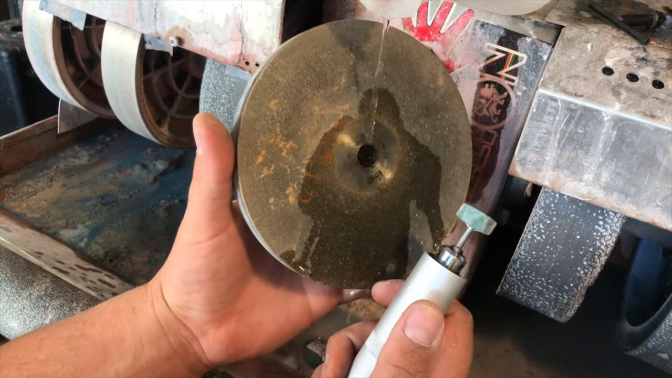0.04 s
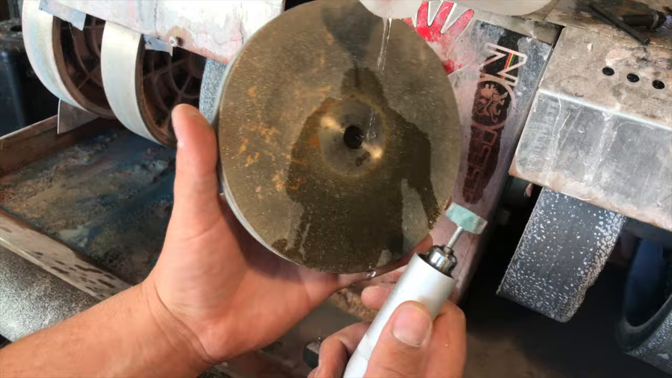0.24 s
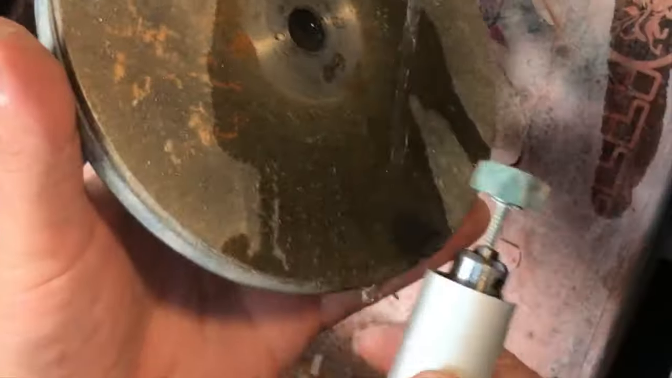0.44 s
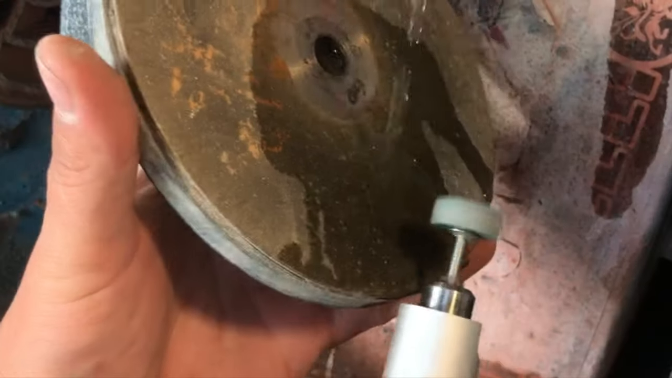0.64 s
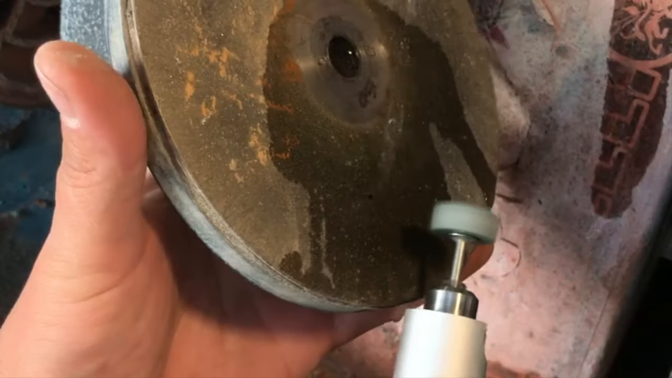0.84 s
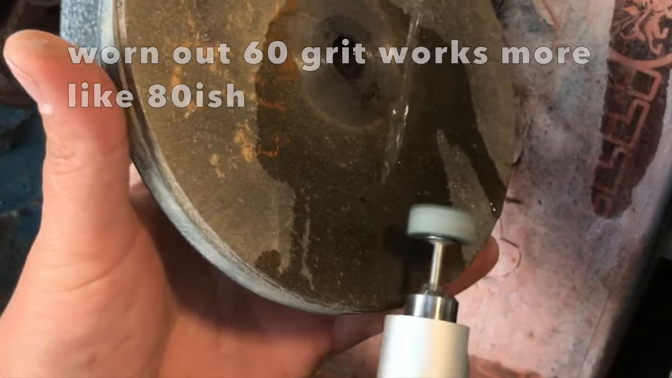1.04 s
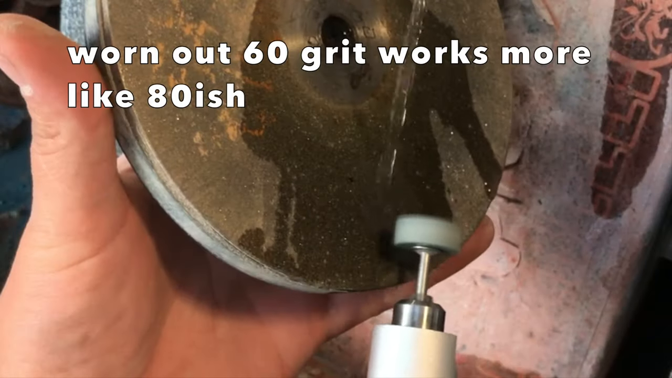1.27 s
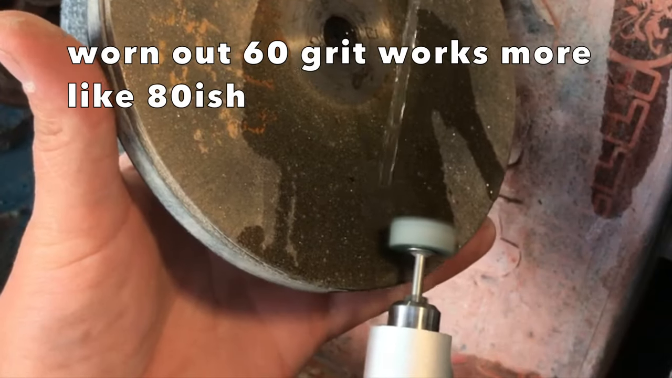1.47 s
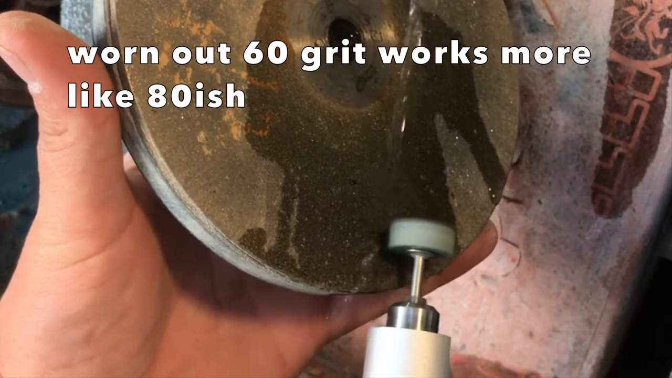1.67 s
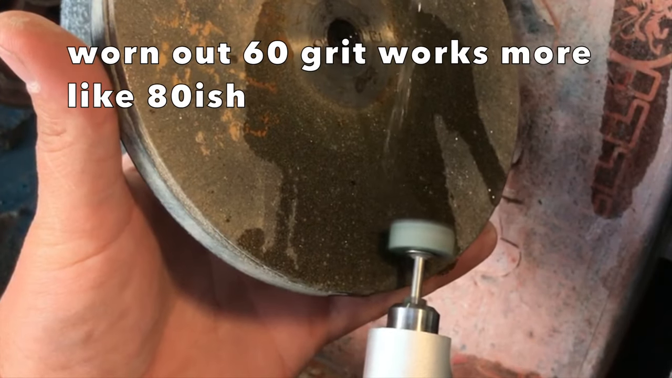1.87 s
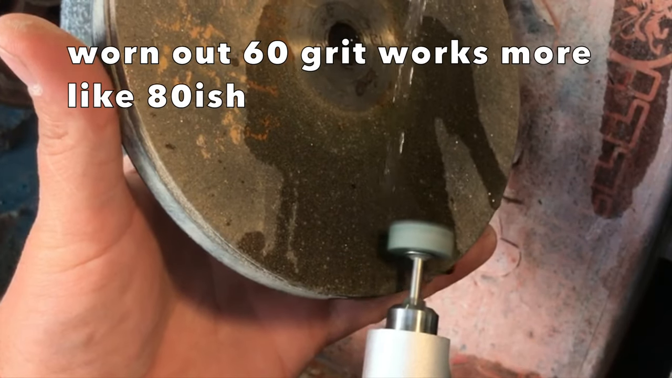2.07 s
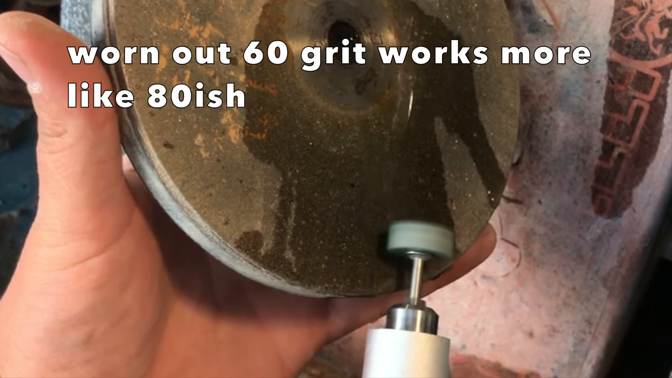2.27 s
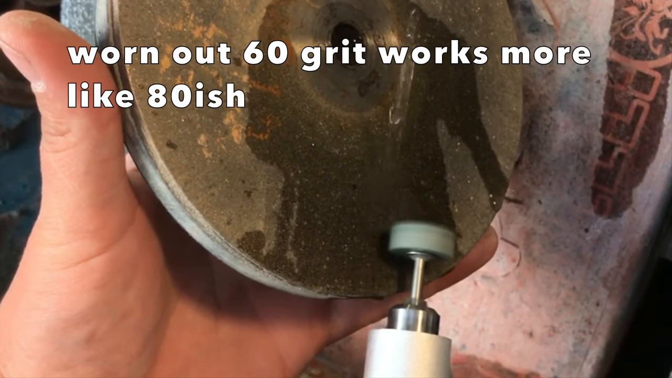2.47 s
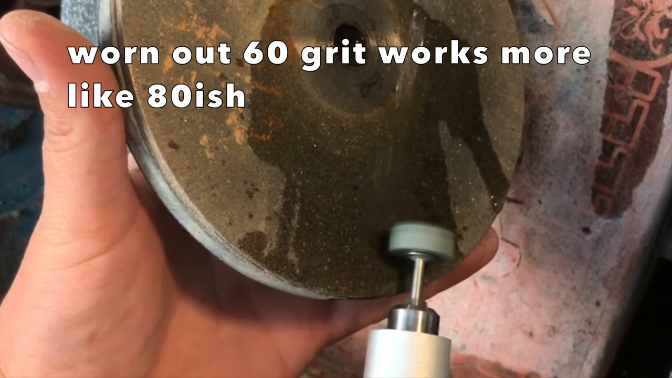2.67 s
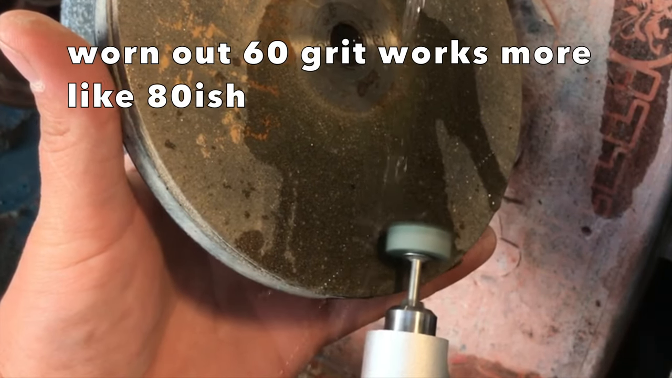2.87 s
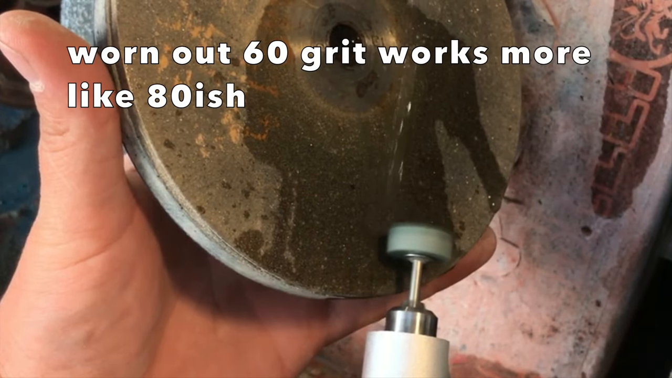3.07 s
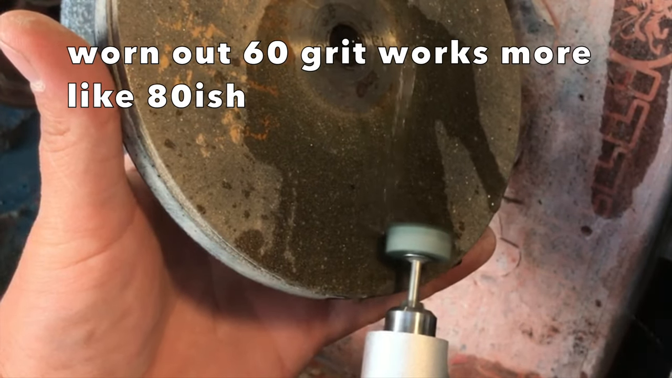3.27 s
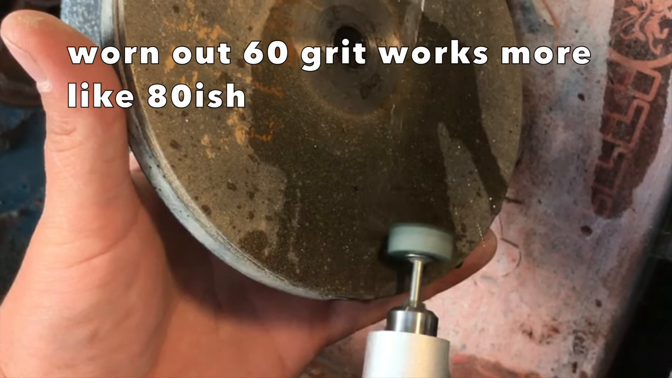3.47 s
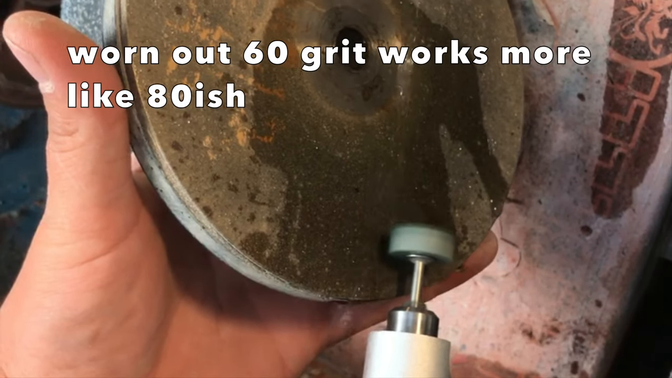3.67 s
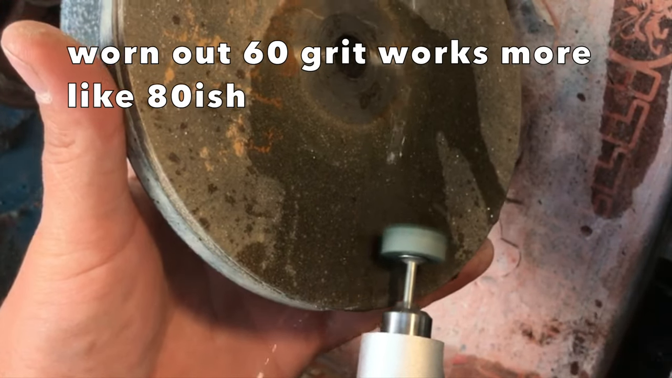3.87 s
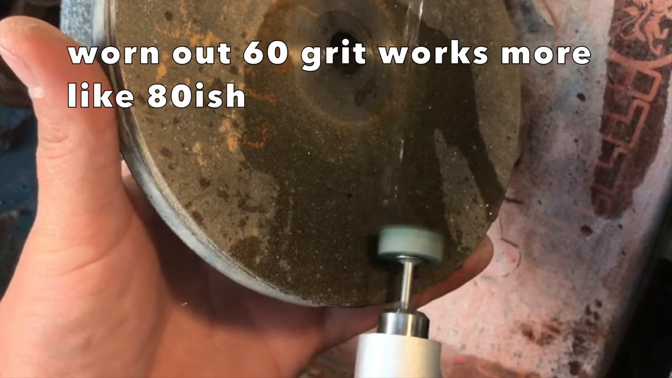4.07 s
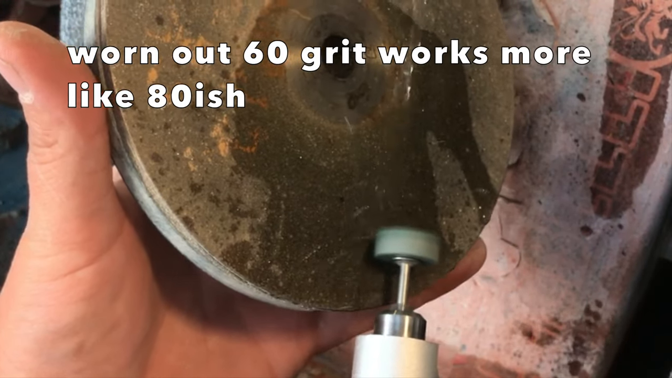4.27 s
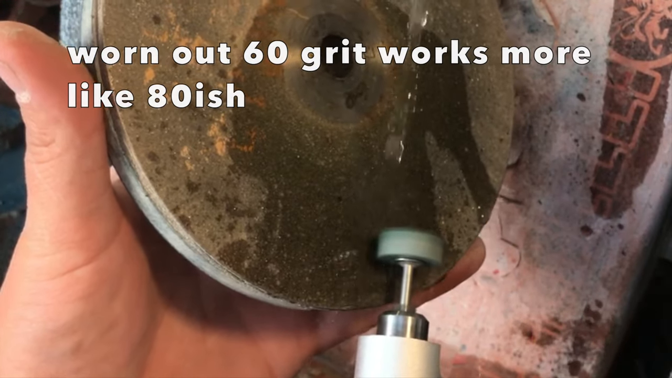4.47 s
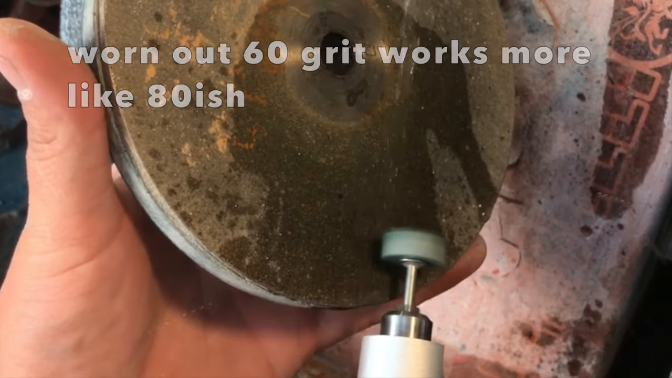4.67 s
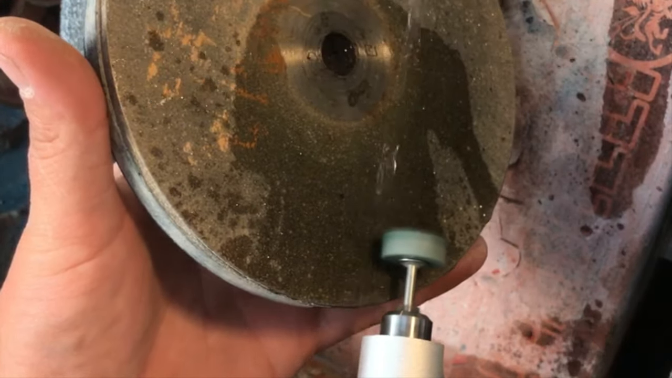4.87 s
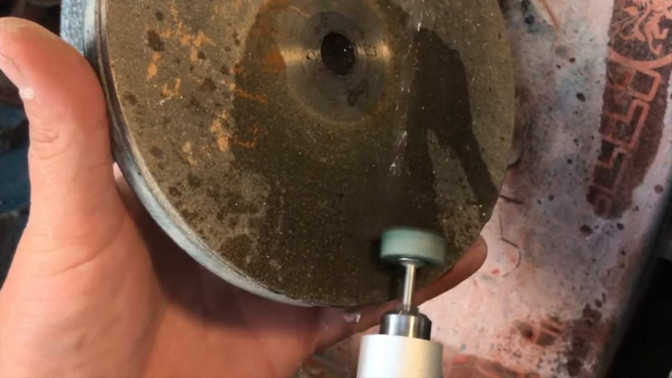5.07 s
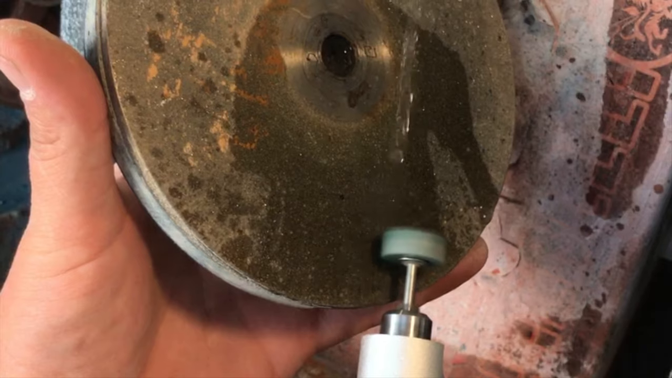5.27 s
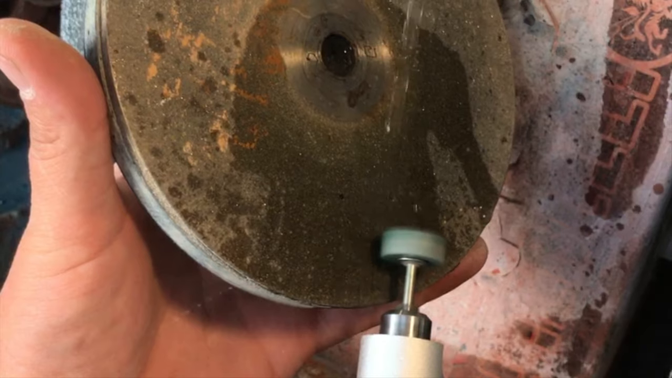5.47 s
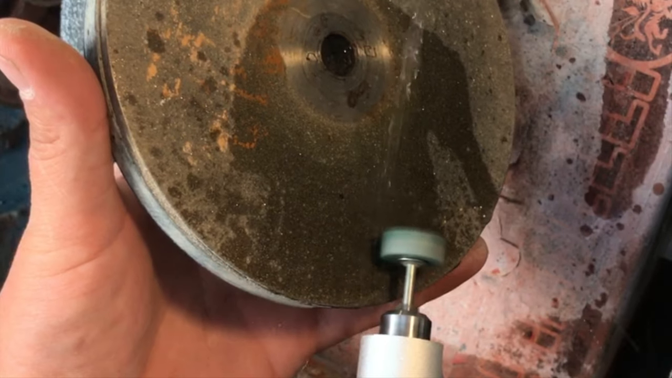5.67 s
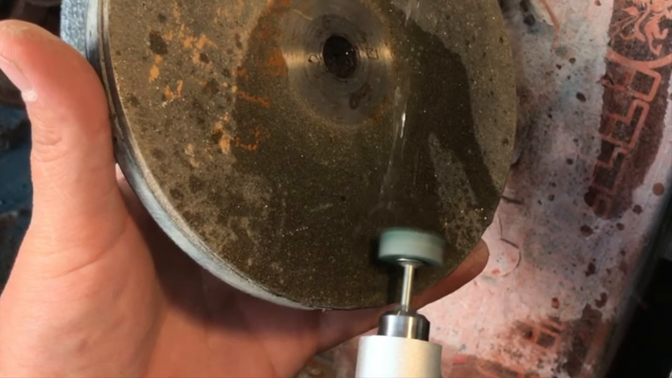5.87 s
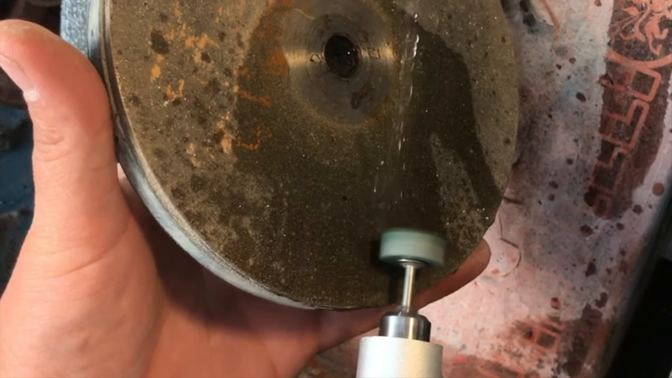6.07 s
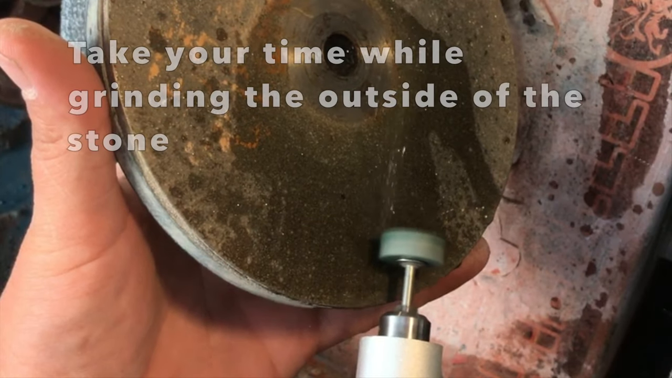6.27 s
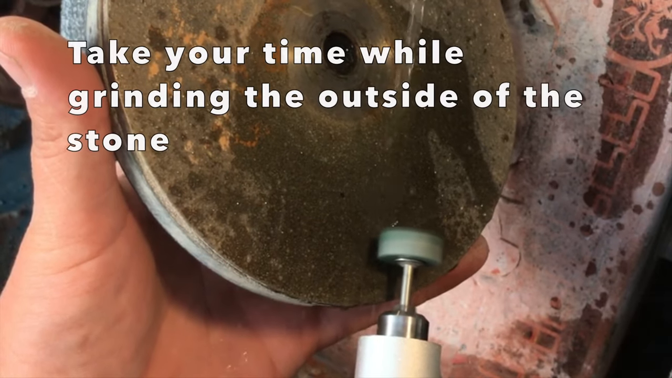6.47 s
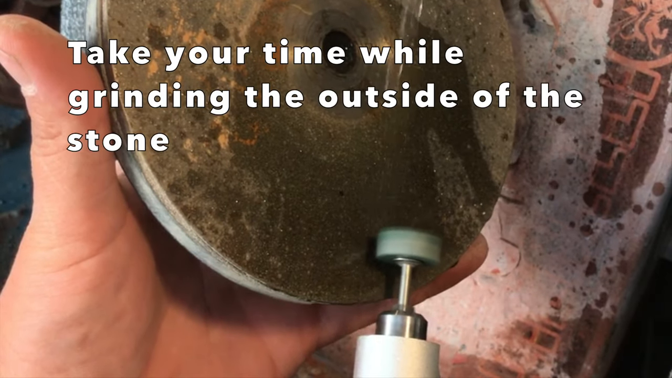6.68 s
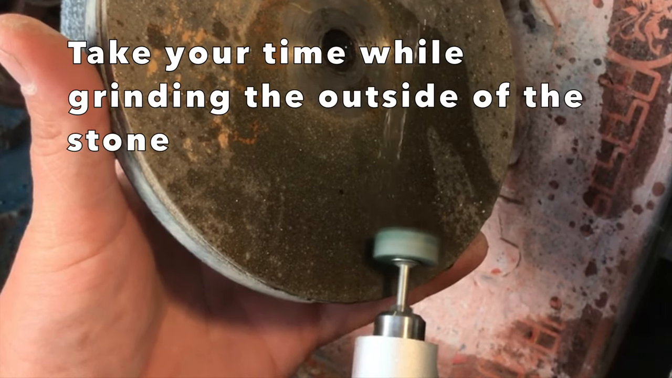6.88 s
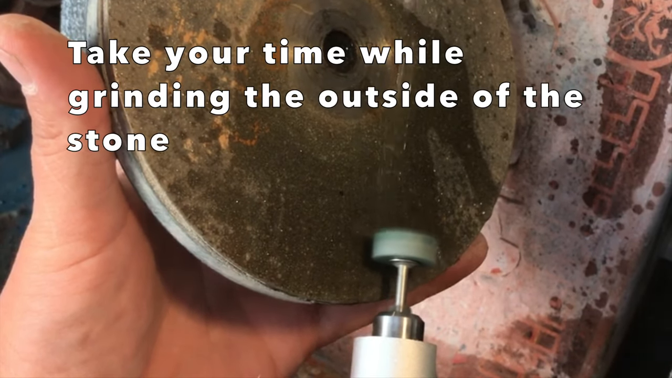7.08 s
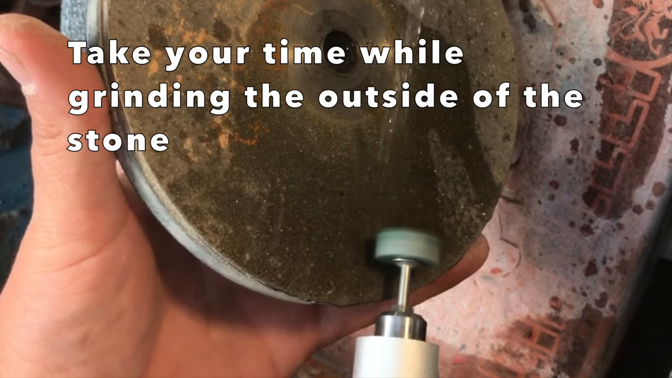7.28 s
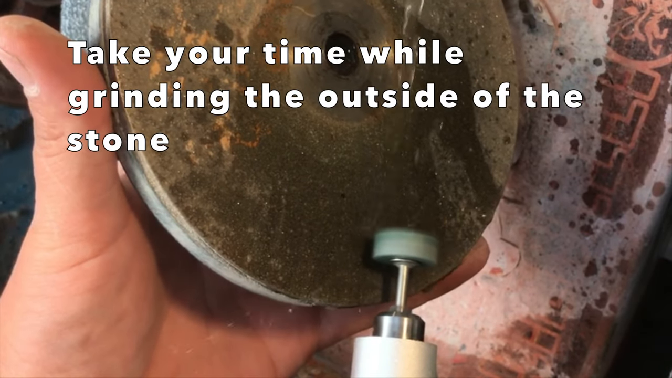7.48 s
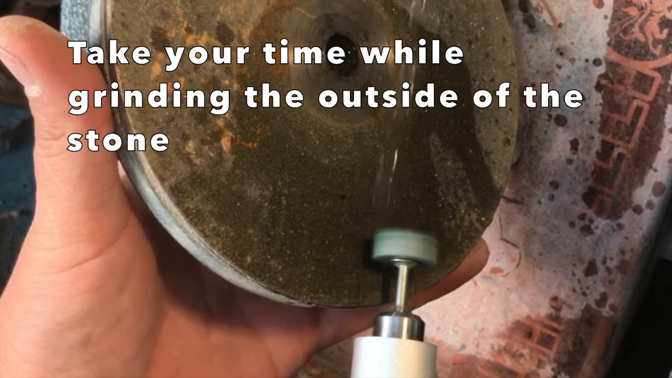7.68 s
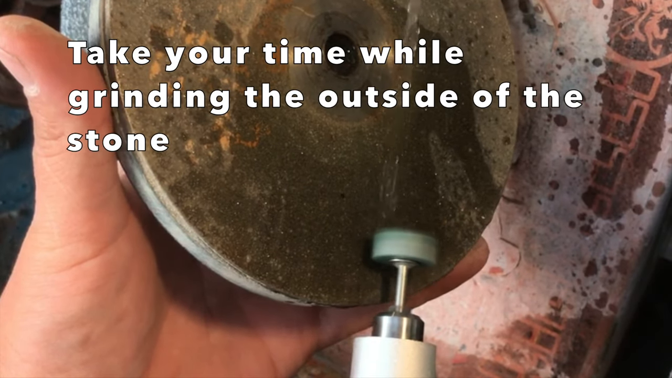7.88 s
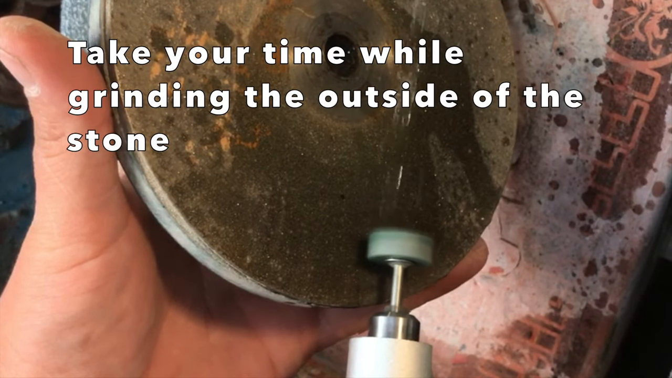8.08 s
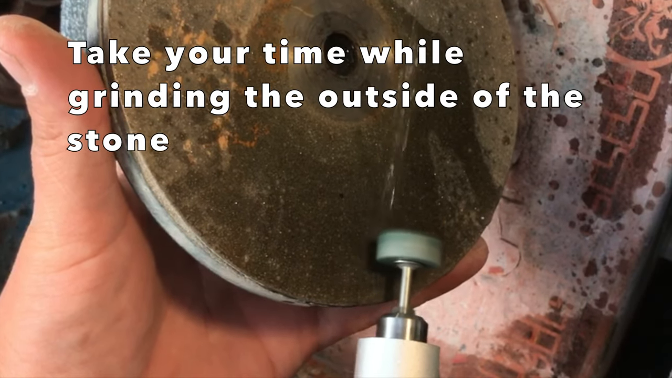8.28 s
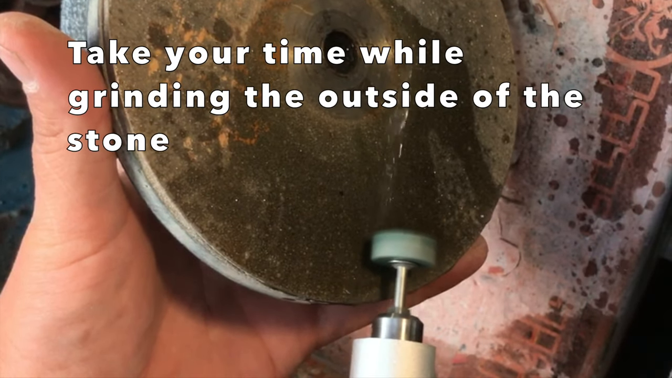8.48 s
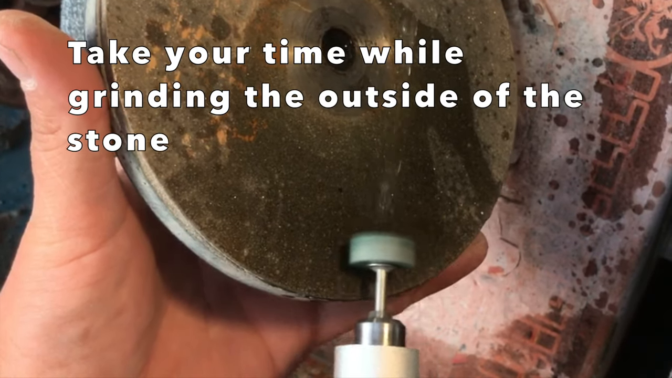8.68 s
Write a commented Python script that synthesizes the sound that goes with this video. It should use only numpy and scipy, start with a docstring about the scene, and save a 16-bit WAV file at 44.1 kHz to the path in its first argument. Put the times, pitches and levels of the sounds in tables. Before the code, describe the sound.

A small rotary tool switches on and whirs while its grinding stone knocks, scrapes and then chatters against a wet diamond plate.

```python
"""A flex shaft rotary tool is picked up with a few clicks and bumps, and switched on at 0.6 s.
It rasps, hums and whines up to about 408 turns a second, over the whirr of motor and bearings.
Its stone, dressed on a wet diamond plate, is out of round: it bounces and lands whole turns later.
From 1.5 s each strike knocks the plate and scrapes grit off, singly and in short rattles at first.
A thin squeal passes near 4.4 s, then the stone is pressed on and a dense chatter runs to the end."""
import sys
import numpy as np
from scipy import signal
from scipy.fft import rfft, irfft
from scipy.io import wavfile

SR = 44100
rng = np.random.default_rng(int(sys.argv[2]) if len(sys.argv) > 2 else 0)


def to_wav(sig):
    """Store sig (one row per channel, or 1-D mono) as 16-bit WAV at the path in sys.argv[1].

    Samples outside -1..1 are clipped; the rate is SR.
    """
    pcm = np.clip(np.atleast_2d(sig), -1, 1) * 32767
    pcm = np.round(pcm).astype(np.int16)
    wavfile.write(sys.argv[1], SR, pcm.T)  # frames by channels


N = 384552
T = np.arange(N) / SR
SWITCH_S, TOP_HZ = .627, 408


# ring of the plate, one mode a row: f/Hz, width/Hz (widened to 80 at least), relative level/dB
PLATE_MODES = [(983, 50, -26.5), (1677, 62, 0), (2070, 58, -1), (2394, 67, 5.5), (2734, 74, 4),
               (2838, 170, -4), (3643, 150, -4.5), (4234, 74, -5.5), (4920, 78, -4.5), (6000, 260, -8),
               (9250, 170, -4.5)]
# colour of the grit, resonances of stone and plate: f/Hz, width/Hz, relative level/dB
GRIT_MODES = [(2670, 470, -4.5), (3500, 2500, -10), (3700, 23, -3), (4190, 110, -4.5), (4925, 100, -0.5),
              (6120, 300, -1.5), (6920, 300, -5.5), (8280, 510, -2), (7770, 100, -5), (9540, 140, 1),
              (10410, 164, -1), (11100, 490, -2.5), (12810, 160, 0.5), (13460, 190, 2.5), (14200, 160, -8),
              (15870, 450, -4.5)]
def stone_strikes(times, knock_gains, scrape_gains, contact_s=.0048, crack=.9, crack_decay_s=.0003):
    """Each strike rings the plate, cracks grains off and drags them while the stone touches."""
    hit_norm = np.sqrt(.004 * SR)  # the energy of 4 ms at rms 1
    # the hand under the plate keeps every mode short
    ring = body([(hz, max(width, 80), db) for hz, width, db in PLATE_MODES])
    # bending waves travel slower at low pitch, so the knock slides down as it dies
    ring = ring - 2 * signal.lfilter(*signal.iirpeak(2150, 3.2, fs=SR), ring)
    ring *= hit_norm / np.linalg.norm(ring)
    t = np.arange(len(ring)) / SR
    drag = np.exp(-(t / contact_s) ** 2) + crack * np.exp(-t / crack_decay_s)
    drag *= hit_norm / np.linalg.norm(drag)
    knocks, pressure = np.zeros(N), np.zeros(N)
    for s, knock, scrape in zip(times, knock_gains, scrape_gains):
        add(knocks, s, knock * ring)
        add(pressure, s, scrape * drag)
    grit = body(GRIT_MODES)
    scrapes = through(pressure * rng.standard_normal(N), grit / np.linalg.norm(grit))
    return high_pass(knocks, hz=1160) + scrapes


def bounces(turns, start, end, flight_turns, uneven):
    """Strike times and flights: the stone stays off the plate for two or more whole turns."""
    flights = np.maximum(np.round(flight_turns * np.exp(uneven * rng.standard_normal(1000))), 2)
    landing_turns = np.round(np.interp(start, T, turns)) + np.cumsum(flights) - flights[0]
    times = np.interp(landing_turns, turns, T)
    heard = times < min(end, T[-1])
    return times[heard], flights[heard]


def scatter(count, knock_db, scrape_db=3.5):
    """Random accents in dB for each knock and scrape; the scrape has a ceiling."""
    knock, scrape = rng.standard_normal((1000, 2))[:count].T
    return knock_db * knock, scrape_db * np.minimum(scrape, 1.4)


# the chatter builds as the stone is pressed on: t/s, knock level/dB, scrape level/dB (before trim)
CHATTER_BUILD = [(1.5, -66, -53), (1.7, -70, -45), (2.6, -55, -47.5), (3.7, -48.5, -43.5), (4.45, -53, -42),
                 (4.65, -41.5, -40), (5.2, -39.5, -39), (6.4, -39, -36.5), (7.6, -38, -37),
                 (8.72, -40, -37.5)]
# ducks where the hand eases off: t/s, half length/s, scrape dip/dB
HAND_EASES = [(3.94, 0.039, 23), (4.27, 0.053, 11), (4.8, 0.053, 8), (5.08, 0.06, 0), (5.89, 0.046, 3),
              (6.058, .03, 4), (6.226, .05, 2.5), (6.572, .04, 1), (6.818, 0.036, 9.5), (7.161, 0.04, 11),
              (7.83, 0.016, 7), (8.31, 0.036, 9), (8.464, 0.022, 5)]
def chatter(turns, knock_trim_db=3.5, scrape_trim_db=3.0):
    """Dense low bounces that follow the pressure of the hand; a longer flight ends in a harder knock."""
    s, knock_db, scrape_db = np.transpose(CHATTER_BUILD)
    times, flights = bounces(turns, s[0], T[-1], flight_turns=3.2, uneven=.27)
    knock_accent, scrape_accent = scatter(len(times), knock_db=2.0)
    dip_db = bumps(times, HAND_EASES)  # takes more from the scrape than from the knock
    knock = amp(np.interp(times, s, knock_db) + knock_trim_db - .34 * dip_db + knock_accent)
    scrape = amp(np.interp(times, s, scrape_db) + scrape_trim_db - dip_db + scrape_accent)
    return stone_strikes(times, knock * np.sqrt(flights / flights.mean()), scrape)


# rattle cues: start t/s, end t/s, typical flight/turns, knock level/dB, scrape level/dB (before trim)
RATTLE_CUES = [(1.946, 2.09, 6.1, -30.5, -35), (2.093, 2.45, 7.6, -30, -34.5),
               (2.456, 2.64, 8.8, -32, -33.5), (2.689, 2.79, 9, -37, -34), (2.902, 3.11, 7, -33.5, -41),
               (3.251, 3.29, 5, -31.5, -33), (3.506, 3.79, 6, -33.5, -38), (3.807, 3.91, 8, -42, -33),
               (4.411, 4.58, 7.2, -44, -33)]
def rattles(turns, knock_trim_db=-3.5, scrape_trim_db=-1.0):
    """The lightly held stone bounces high, in short runs of hard, nearly even hits."""
    runs = []
    for start, end, flight_turns, knock_db, scrape_db in RATTLE_CUES:
        times, _ = bounces(turns, start, end, flight_turns, uneven=.11)
        knock_accent, scrape_accent = scatter(len(times), knock_db=1.5)
        knock = amp(knock_db + knock_trim_db + knock_accent)
        scrape = amp(scrape_db + scrape_trim_db + scrape_accent)
        runs.append([times, knock, scrape])
    return stone_strikes(*np.hstack(runs))


# one-shot hits of the stone: t/s, knock level/dB, scrape level/dB (before trim)
LONE_HITS = [(1.5773, -37, -32), (1.7897, -33, -37), (1.8603, -39.5, -35), (3.361, -34, -35),
             (4.0052, -36, -32), (4.0226, -30.5, -31.5), (4.1768, -35, -33.5), (4.1963, -37, -32.5),
             (4.3574, -41, -32.5)]
def lone_hits(turns, knock_trim_db=-4.0, scrape_trim_db=1.0):
    """Single strikes, snapped to the nearest moment when the high spot faces the plate."""
    s, knock_db, scrape_db = np.transpose(LONE_HITS)
    times = np.interp(np.round(np.interp(s, T, turns)), turns, T)
    return stone_strikes(times, amp(knock_db + knock_trim_db), amp(scrape_db + scrape_trim_db))


# colour of the running tool's whirr: f/Hz, width/Hz, relative level/dB
WHIRR_BANDS = [(1018, 107, 1.5), (1210, 150, -4), (1580, 250, -2), (2560, 310, 2), (3100, 74, 1),
               (3700, 310, -3.5), (4990, 200, 2), (6480, 380, 2), (6600, 176, -12), (7960, 3300, -4),
               (8850, 360, -1), (11310, 500, -1.5), (13900, 3300, -10.5)]
# swells where the stone skims the wet plate: t/s, half length/s, boost/dB
SKIM_SWELLS = [(1.377, 0.52, 5.5), (3.1, 0.31, 3.5), (3.645, 0.1, 2)]
def whirr(speed, turns, throb=.18, db_per_octave=3):
    """Grainy whirr of motor and bearings, swelling with speed and when the stone skims the plate."""
    hiss = rng.standard_normal(N) * (1 + throb * np.cos(2 * np.pi * turns))
    hiss *= amp(1.5 * wander(hz=700))  # grain
    level = amp(-42 + db_per_octave * np.log2(speed / TOP_HZ) + bumps(T, SKIM_SWELLS)) * (T > SWITCH_S)
    return level * unit(high_pass(through(hiss, body(WHIRR_BANDS)), hz=560))


# spin-up in three stages: share of the gap to top speed, time constant/s
SPIN_UP = [(.412, .065), (.498, .262), (.09, 1.1)]
# pitch bend from the load on the stone: t/s, speed offset/Hz
LOAD_BEND = [(2, 0), (2.4, -1), (3.3, 1), (3.7, 0), (4.45, 3.4), (5.3, -.4), (6.1, 1), (6.8, -1.2),
             (7.4, 0)]
def shaft_speed():
    """Turns a second: a quick run-up, then a slow drift and a slight waver under load."""
    gap = sum(share * np.exp(-np.maximum(T - SWITCH_S, 0) / lag) for share, lag in SPIN_UP)
    return np.maximum(TOP_HZ * (1 - gap) + curve(LOAD_BEND), 1) * (1 + .0006 * wander(hz=6))


def shaft_tones(turns, partials, jitter, flutter, flutter_hz):
    """Whole and half multiples of the shaft speed; the flexible shaft twists a little, so they waver."""
    angle = 2 * np.pi * (turns + jitter * wander(flutter_hz))
    return unit(sum(amp(db) * (1 + flutter * wander(flutter_hz)) * np.sin(multiple * angle)
                    for multiple, db in partials))


# housing resonances that the shaft sweeps through: f/Hz, half width/Hz, boost/dB
HOUSING_PEAKS = [(284.6, 18, 27.5), (318.4, 18.5, 20.5), (359.8, 25.5, 20)]
def hum(speed, turns):
    """The unbalanced shaft hums, and blooms as it passes each resonance of the housing."""
    level = amp(-60 + bumps(speed, HOUSING_PEAKS)) * speed / TOP_HZ
    return level * shaft_tones(turns, [(1, 0)], jitter=.0067, flutter=.12, flutter_hz=25)


# voicing of the whine: multiple of the shaft speed, relative level/dB
WHINE_PARTIALS = [(2, -5.5), (4, -3.5), (5, -4.5), (6, -4.5), (7, -13), (8, -5), (9, -7), (10, -14),
                  (11, -4.5), (11.5, 0), (12, 5.5), (12.5, -8), (13, -0.5), (48, -11)]
def whine(turns, start_s=.736, attack_s=.04, fade_db_per_s=4.8, sway_db=2):
    """A wavering whine sets in as the shaft picks up, then fades to a floor with the motor's load."""
    level_db = np.maximum(-41 - fade_db_per_s * (T - start_s), -57) + sway_db * wander(hz=6)
    level = amp(level_db) * np.clip((T - start_s) / attack_s, 0, 1)
    return level * shaft_tones(turns, WHINE_PARTIALS, jitter=.0056, flutter=.31, flutter_hz=30.2)


# voicing of the squeal: multiple of the shaft speed, relative level/dB
SQUEAL_PARTIALS = [(7, -6), (8, 4), (9, -4)]
def squeal(turns, peak_s=4.42, half_length_s=.46):
    """A thin squeal swells and fades while the stone runs almost free."""
    level = amp(-52.5) * bumps(T, [(peak_s, half_length_s, 1)])
    return level * shaft_tones(turns, SQUEAL_PARTIALS, jitter=.003, flutter=.24, flutter_hz=25)


# envelope of the rasp: t/s, level/dB (before the motor fader)
RASP_ENVELOPE = [(0.66, -47), (0.7, -42.5), (0.77, -44), (0.9, -76)]
# voicing of the rasp: multiple of the shaft speed, relative level/dB
RASP_PARTIALS = [(2, 23), (24, 20), (48, 13), (96, 4.9)]
def starting_rasp(turns):
    """The motor rasps briefly under its starting load."""
    tone = shaft_tones(turns, RASP_PARTIALS, jitter=.03, flutter=.43, flutter_hz=117)
    gate = (T > SWITCH_S) * (T < RASP_ENVELOPE[-1][0])
    return high_pass(amp(curve(RASP_ENVELOPE)) * tone * gate, hz=290)


# envelope of the drone: t/s, level/dB (before the motor fader)
DRONE_ENVELOPE = [(.7, -50), (.85, -44), (1.05, -52), (2, -59), (8.72, -58)]
# EQ of the drone: f/Hz, relative level/dB
DRONE_EQ = [(25, -23), (80, -7.5), (115, -5), (140, -5), (178, 3.5), (210, -8.5), (280, 2), (390, 1),
            (470, -3.5), (600, -6), (760, -10), (1000, 1), (1500, -20.5)]
def housing_drone():
    """The motor housing drones, most while the shaft shakes on its way up."""
    return amp(curve(DRONE_ENVELOPE)) * noise(DRONE_EQ)


def motor(speed, turns):
    """Tones and drone of the motor on one fader, which opens around the switch click."""
    fader = curve([(.57, .025), (.64, .92)])
    layers = hum(speed, turns) + whine(turns) + squeal(turns) + starting_rasp(turns) + housing_drone()
    return fader * layers


# foley of grip, switch and shaft: t/s, level/dB, f/Hz, width/Hz, decay/s
HANDLING_CUES = [(0.123, -45.5, 7200, 1800, .005), (0.16, -43, 5570, 570, 0.012),
                 (0.332, -40.5, 30, 4.4, 0.15), (0.372, -47.5, 517, 57, 0.035),
                 (0.44, -57.5, 3000, 3500, 0.15), (0.483, -43.5, 790, 160, 0.005),
                 (0.614, -36, 10100, 11000, .0015), (0.638, -33.5, 1560, 190, 0.0085),
                 (0.635, -37, 4800, 2000, 0.0052), (0.791, -31.5, 275, 140, 0.016)]
def handling():
    """Clicks and bumps: dying bursts of noise, each in one resonance."""
    out, t = np.zeros(N), np.arange(SR // 2) / SR
    for s, db, hz, width, decay in HANDLING_CUES:
        burst = unit(through(rng.standard_normal(len(t)), body([(hz, width, 0)], size=16384)))
        add(out, s, amp(db) * burst * np.exp(-t / decay))
    return out


def workshop_reverb(x, t60=.083, wet_db=-13, echoes_per_s=3000):
    """Adds a short tail of sparse reflections from bench and walls."""
    t = np.arange(SR // 2) / SR
    taps = rng.standard_normal(len(t)) * (rng.random(len(t)) < echoes_per_s / SR)
    taps *= (t > .003) * amp(-60 * t / t60)
    return x + amp(wet_db) * through(x, taps / np.linalg.norm(taps))


# envelope of the room tone: t/s, level/dB
ROOM_ENVELOPE = [(0, -52), (0.42, -54), (0.56, -63), (1, -73.5)]
# EQ of the still workshop: f/Hz, relative level/dB
ROOM_EQ = [(12, -33), (20, -0.5), (48, 1.5), (222, -19.5), (1120, -24), (3160, -29), (4940, -33.5),
           (12400, -36.5), (16000, -37)]
def room_tone():
    """Air rumbles while things are moved into place, then settles."""
    return amp(curve(ROOM_ENVELOPE)) * noise(ROOM_EQ)


def amp(db):
    return 10 ** (np.asarray(db) / 20)


def unit(x):
    return x / np.sqrt(np.mean(x ** 2) + 1e-20)


def curve(rows):
    """Breakpoints (time, value) joined by straight lines."""
    return np.interp(T, *np.transpose(rows))


def bumps(x, rows):
    """A sum of smooth bumps along x, each given as (centre, half width, height)."""
    return sum(height * np.exp(-((x - centre) / width) ** 2) for centre, width, height in rows)


def add(mix, s, sound):
    part = mix[max(round(s * SR), 0):][:len(sound)]
    part += sound[:len(part)]


def wander(hz):
    """Random modulation of rms 1, up to about hz."""
    f = np.fft.rfftfreq(N, 1 / SR)
    return unit(irfft(rfft(rng.standard_normal(N)) / (1 + (f / hz) ** 4), N))


def noise(eq):
    """Steady noise of rms 1 with the given spectrum."""
    hz, db = np.transpose(eq)
    f = np.fft.rfftfreq(N, 1 / SR)
    gain = amp(np.interp(np.log(f + 1), np.log(hz + 1), db))
    return unit(irfft(rfft(rng.standard_normal(N)) * gain, N))


def body(resonances, size=4096):
    """Causal impulse response of a set of overlapping resonances."""
    f = abs(np.fft.fftfreq(size, 1 / SR)) + 1
    power = sum(amp(db) ** 2 / (1 + ((f - hz ** 2 / f) / width) ** 2) for hz, width, db in resonances)
    log_gain = np.log(power + 1e-7) / 2
    return np.fft.ifft(np.exp(np.conj(signal.hilbert(log_gain)))).real[:size // 2]


def through(x, response):
    return signal.oaconvolve(x, response)[:len(x)]


def high_pass(x, hz):
    return signal.sosfilt(signal.butter(3, hz, "high", fs=SR, output="sos"), x)


def scene():
    """Tool and plate sit dead centre; the shaft speed drives strikes, whirr and motor tones."""
    speed = shaft_speed()
    turns = np.cumsum(speed) / SR
    hits = lone_hits(turns) + rattles(turns) + chatter(turns) + handling()
    mono = workshop_reverb(hits) + whirr(speed, turns) + motor(speed, turns) + room_tone()
    return np.array([mono, mono])


def record(dry, cutoff_hz=15850):
    """A steep high cut on the whole mix."""
    high_cut = signal.firwin(511, cutoff_hz, window=("kaiser", 9), fs=SR)
    return signal.oaconvolve(dry, high_cut[None], "same")


dry = scene()
out = record(dry)
to_wav(out)
```